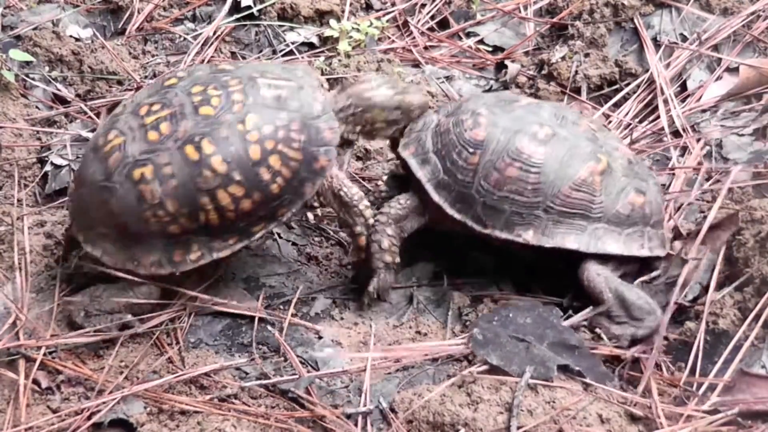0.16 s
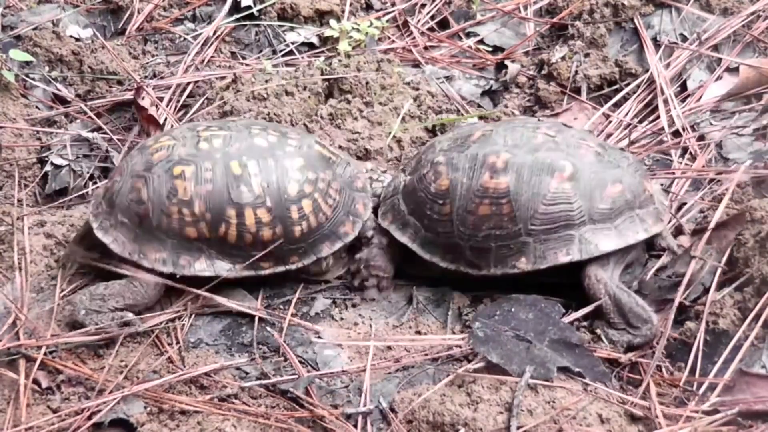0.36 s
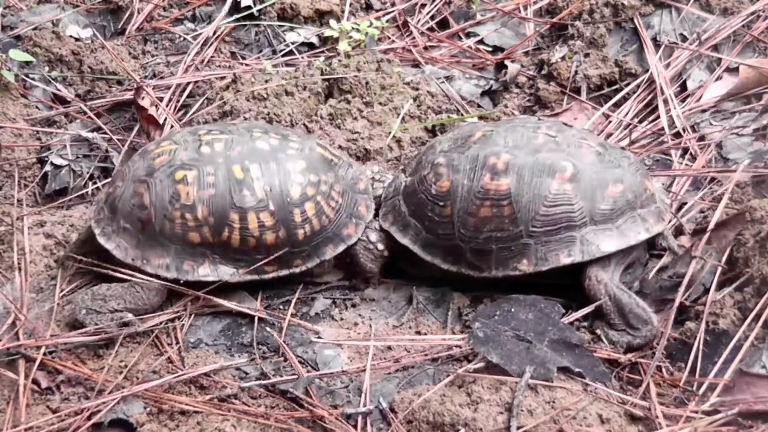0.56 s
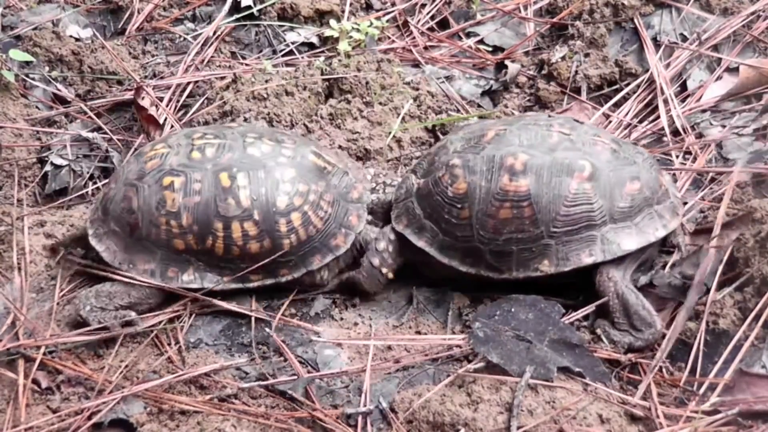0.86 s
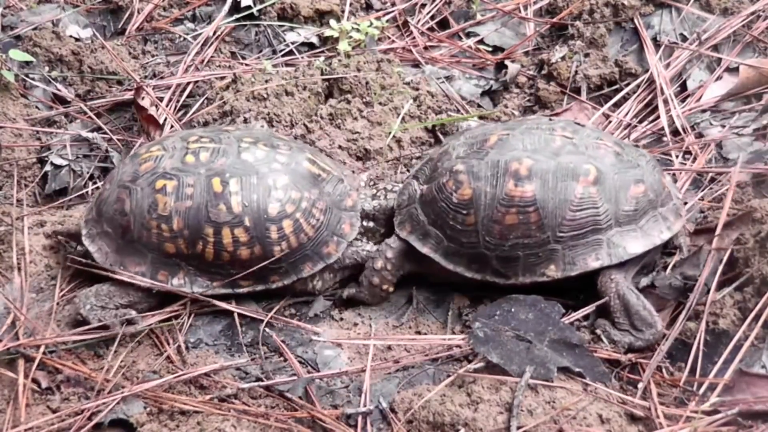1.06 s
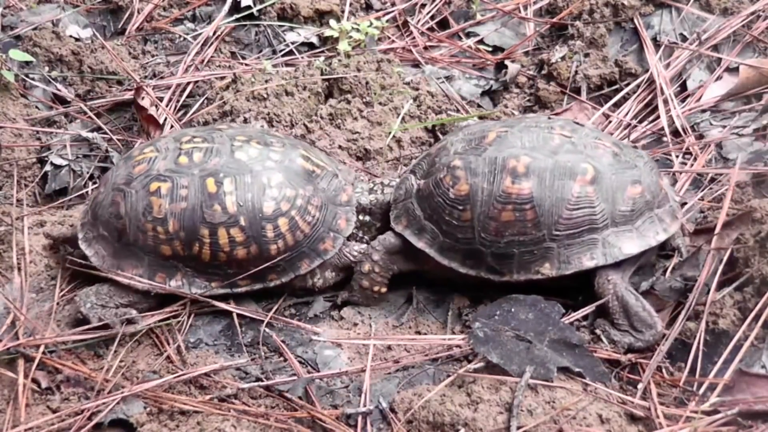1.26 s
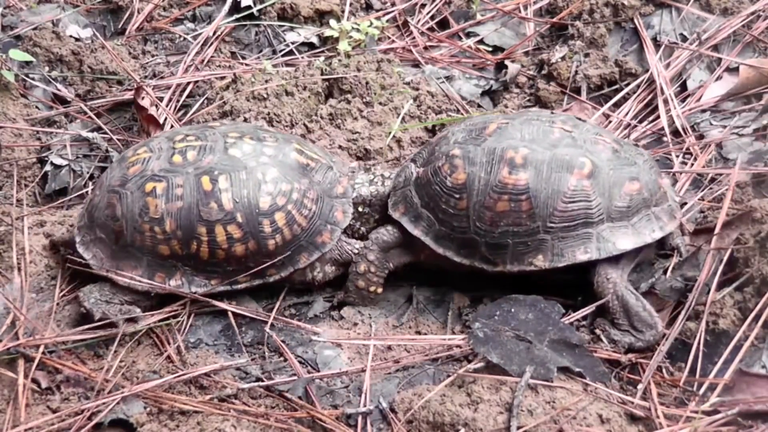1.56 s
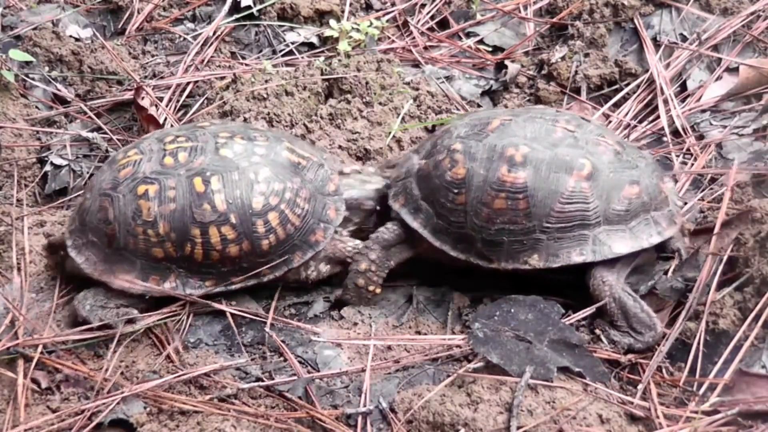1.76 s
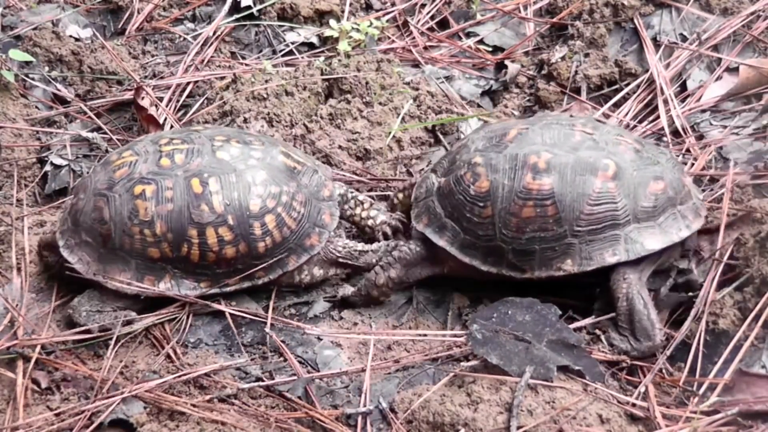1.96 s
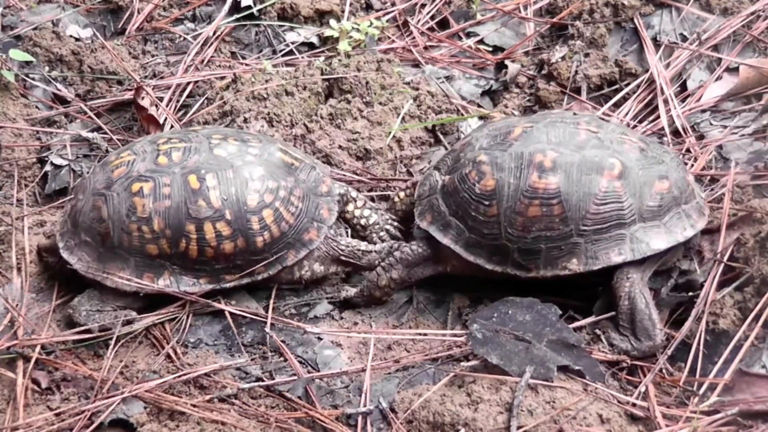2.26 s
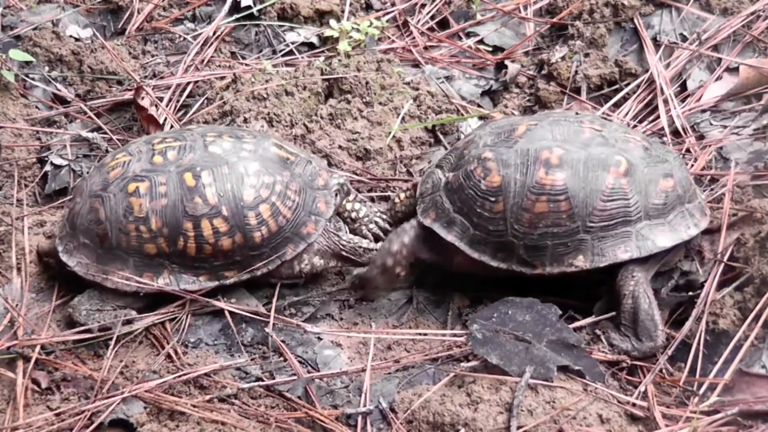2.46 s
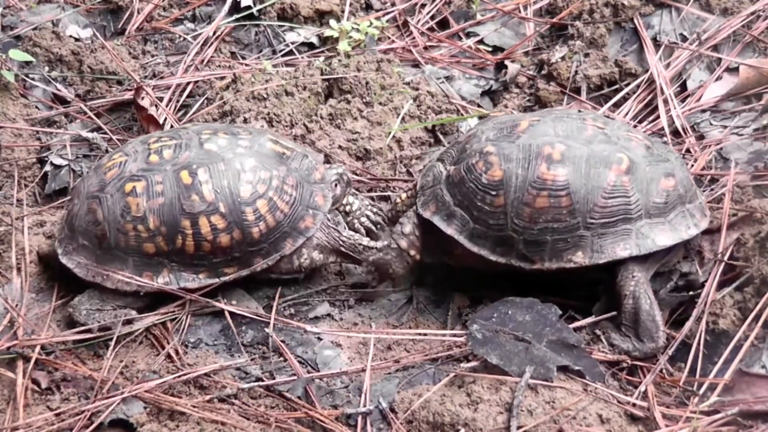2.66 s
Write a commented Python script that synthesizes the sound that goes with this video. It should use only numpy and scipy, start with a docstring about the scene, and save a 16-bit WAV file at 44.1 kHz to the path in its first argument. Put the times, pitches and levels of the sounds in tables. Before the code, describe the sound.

Shrill insect chorus fills a woodland while turtle shells scuff and bump and a crow caws

```python
"""A chorus of insects shrills near 7 kHz all around a woodland floor, over a low rumble and a soft hiss.
Far off, a crow caws four times as pulsed harmonics that echo among the trees; a faint noise trill and
a thin wavering tone fade out after the first second. Close to the microphone, two turtles shove each
other: shells scuff through soil and needles as filtered grains and noise bursts, bump down as dull
pushes, and give one sharp snap made of a crack, ringing modes and a scattered tail."""
import sys
import numpy as np
from scipy import signal
from scipy.fft import rfft, irfft, next_fast_len
from scipy.io import wavfile

SR = 44100
rng = np.random.default_rng(int(sys.argv[2]) if len(sys.argv) > 2 else 0)


def persist_wave(psi):
    """Save psi, clipped to +-1, as 16-bit WAV."""
    counts = np.round(np.clip(psi, -1, 1) * 32767).astype(np.int16)
    wavfile.write(sys.argv[1], SR, np.atleast_2d(counts).T)


N = 123480  # samples, 2.8 s


def undb(db):
    """Decibels to an amplitude factor."""
    return 10 ** (np.asarray(db) / 20)


def unit(x):
    """Scale to rms 1."""
    return x / np.sqrt(np.mean(x ** 2) + 1e-30)


def noise():
    """White noise over the whole scene."""
    return rng.standard_normal(N)


def clock():
    """Time of every sample in seconds."""
    return np.arange(N) / SR


def colour(x, points):
    """Causal minimum-phase filter through (Hz, dB) points."""
    size = next_fast_len(N + 8192, real=True)
    hz, db = np.array(sorted(points), float).T
    f = np.maximum(np.arange(size // 2 + 1) * SR / size, 1)
    log_gain = np.log(undb(np.interp(np.log(f), np.log(hz), db)))
    # Folding the cepstrum onto positive time makes the filter causal
    cepstrum = irfft(log_gain, size)
    cepstrum[1:size // 2] *= 2
    cepstrum[size // 2 + 1:] = 0
    response = np.exp(rfft(cepstrum))
    return irfft(rfft(x, size) * response, size)[..., :N]


def wavering(hz, width_hz):
    """A narrow noise band: a tone whose level and phase wander, rms 1."""
    f = np.arange(N // 2 + 1) * SR / N
    band = np.exp(-2 * ((f - hz) / width_hz) ** 2)
    return unit(irfft(rfft(noise()) * band, N))


def decay(start, seconds):
    """Sudden onset, exponential fall."""
    t = clock() - start
    return (t >= 0) * np.exp(-np.maximum(t, 0) / seconds)


def ring_down(t, t60):
    """Exponential fall of 60 dB in t60 seconds."""
    return np.exp(-np.log(1000) * t / t60)


def blow(x, db):
    """Set a short sound's level, its energy taken over 5 ms."""
    return unit(x) * np.sqrt(.005 * SR / N) * undb(db)


def stereo(mid, side):
    """Left and right from mid and side."""
    return np.array([mid + side, mid - side])


def spread(x, side_db):
    """Brief scatter from the ground makes left and right differ."""
    scatter = noise()[:768] * np.hanning(1536)[768:]
    side = signal.fftconvolve(x, scatter / np.linalg.norm(scatter))[:N]
    return stereo(x, undb(side_db) * side)


# Spectrum of the air around the microphone. Each row: frequency in Hz, gain in dB.
AIR_SPECTRUM = [(15, -23), (28, -18), (40, -9.5), (62, -8), (110, 1.5), (160, -1.5), (250, -7.5),
                (400, -10.5), (650, -15), (1100, -14), (2000, -18), (2700, -20), (3500, -21), (5000, -25),
                (9500, -33), (12000, -26.5), (14000, -22), (16000, -42)]
# Side against mid in that air. Each row: frequency in Hz, side gain in dB.
AIR_SIDE_SPECTRUM = [(30, 17), (70, -8), (150, -2.5), (500, 6.5), (1500, 0), (3000, -4), (9000, -27.5),
                     (13000, -0.5)]
# Balance of that air. Each row: frequency in Hz, left minus right in dB.
AIR_BALANCE = [(30, 2.5), (120, -4.5), (300, -1), (900, 0), (16000, 0)]
AIR_DB = -58


def air():
    """Low distant rumble under a soft hiss: filtered noise, its bass balance varying with frequency."""
    mid = unit(colour(noise(), AIR_SPECTRUM))
    side = colour(unit(colour(noise(), AIR_SPECTRUM)), AIR_SIDE_SPECTRUM)
    left, right = undb(AIR_DB) * stereo(mid, side)
    # Each channel takes half of the difference
    left = colour(left, [(hz, db / 2) for hz, db in AIR_BALANCE])
    right = colour(right, [(hz, -db / 2) for hz, db in AIR_BALANCE])
    return np.array([left, right])


STROKE_SHARE = .55  # sounding part of each stroke cycle
STROKE_SWEEP_HZ, STROKE_SCATTER_HZ, STROKE_SCATTER_DB = 346.7, 88.26, 2


def singer(rate, pitch_hz):
    """Each stroke is a short falling tone with its own strength and pitch, mixed with a noise band."""
    cycle = clock() * rate + rng.random()
    stroke = cycle.astype(int) % 512
    size, detune, angle = rng.standard_normal((512, 3))[stroke].T
    u = np.minimum(cycle % 1 / STROKE_SHARE, 1)  # progress through the stroke, then silence
    hz = pitch_hz + STROKE_SCATTER_HZ * detune + STROKE_SWEEP_HZ * (.5 - u)
    tone = np.sin(2 * np.pi * np.cumsum(hz) / SR + np.pi * angle)
    tone = tone + 0.61 * wavering(pitch_hz, 780)
    strength = np.sin(np.pi * u) * undb(STROKE_SCATTER_DB * size)
    return unit(strength * tone)


def drone(hz, wander_hz):
    """An even note whose pitch trembles."""
    pitch = hz + wander_hz * wavering(0, 40.1)
    return unit(np.sin(2 * np.pi * np.cumsum(pitch) / SR))


# The nearest insects. Each row: strokes per second, pitch in Hz, level in dB.
NEAR_SINGERS = [(58.37, 7080, -51.5), (36.96, 6900, -50), (19.07, 6850, -53), (13.25, 7200, -59.5),
                (99.9, 7050, -57.5)]
# Insects that hold one note. Each row: pitch in Hz, pitch wander in Hz, level in dB.
HELD_NOTES = [(6716, 18.12, -59), (6970, 13.74, -54.5)]
# Spectrum of the far chorus. Each row: frequency in Hz, gain in dB.
CHORUS_SPECTRUM = [(5000, -52), (5450, -28), (5750, -21), (5950, -11.5), (6500, -13), (6720, -6),
                   (6950, 1.5), (7250, -3.5), (7580, -7.5), (7950, -22.5), (8500, -24.5), (9200, -35.5),
                   (10500, -59.5)]
CHORUS_DB, INSECT_SIDE_DB = -46.5, -19


def insects():
    """A few near singers and held notes stand out of a far chorus blurred into filtered noise."""
    near = sum(undb(db) * singer(rate, hz) for rate, hz, db in NEAR_SINGERS)
    held = sum(undb(db) * drone(hz, wander) for hz, wander, db in HELD_NOTES)
    far = undb(CHORUS_DB) * unit(colour(noise(), CHORUS_SPECTRUM))
    return spread(near + held + far, INSECT_SIDE_DB)


# Spectrum of the faint trill. Each row: frequency in Hz, gain in dB.
TRILL_SPECTRUM = [(2200, -22), (2650, 0), (3000, 1), (3200, -2), (3550, 0), (4000, -12), (4700, -5),
                  (5600, -24)]
TRILL_HZ, TRILL_DB = 59.9, -67
TRILL_DECAY = 0.4  # decay constant of a pulse, in pulse periods
TRILL_END_S, TRILL_FADE_S = 1.06, 0.069  # the fade begins at the end time
TONE_HZ, TONE_WIDTH_HZ, TONE_DB = 1051, 88, -64.5
TONE_START_S, TONE_END_S, TONE_FADE_S = 0.3, 0.98, 0.29  # full between start and end


def far_calls():
    """A faint rattling trill of decaying noise pulses, and a thin wavering tone."""
    t = clock()
    pulses = noise() * np.exp(-(t * TRILL_HZ % 1) / TRILL_DECAY)
    fade = np.clip((TRILL_END_S - t) / TRILL_FADE_S + 1, 0, 1)
    trill = undb(TRILL_DB) * unit(colour(pulses, TRILL_SPECTRUM)) * fade
    gate = np.clip(np.minimum(t - TONE_START_S, TONE_END_S - t) / TONE_FADE_S + 1, 0, 1)
    tone = undb(TONE_DB) * gate * wavering(TONE_HZ, TONE_WIDTH_HZ)
    return spread(trill + tone, -20)


# Colour of the echoes among the trees. Each row: frequency in Hz, gain in dB.
WOOD_SPECTRUM = [(300, -20), (720, -1), (1000, -1), (1150, 1), (1330, 2.5), (1490, 0), (2200, -4),
                 (5000, -2.5), (9000, -10.5)]
WOOD_SIDE_DB = -7.5


def echoes(x, envelope):
    """A cloud of random reflections under an envelope, unlike left and right."""
    def cloud():
        reflections = unit(colour(noise() * envelope, WOOD_SPECTRUM))
        return signal.fftconvolve(x, reflections)[:N] / np.sqrt(N)

    mid, side = cloud(), cloud()
    return stereo(mid, undb(WOOD_SIDE_DB) * side) / 2


# The caws. Each row: start in seconds, length in seconds, pitch ratio, level in dB.
CAW_TIMES = [(.524, 0.11, 0.99, -50), (0.887, 0.12, 0.97, -50.5), (1.366, .126, 1.0, -50),
             (1.898, 0.13, 1.0, -49)]
# Course of every caw. Each row: share of its length, pitch in Hz before the ratio, effort in dB,
# extra level of the second harmonic in dB, roughness from 0 to 1.
CAW_COURSE = [(0, 520, -13, 13, .6), (.12, 625, -2, -3.5, .55), (.25, 740, -5.5, -10, 0.1),
              (.42, 755, -2.5, -1, 0.26), (.58, 743.6, -5, 4.5, 0.09), (.76, 659, -7, 5.5, 0.6),
              (1, 570, -6.5, 1, 0.4)]
# Resonances of the crow's throat. Each row: frequency in Hz, gain in dB.
THROAT_SPECTRUM = [(400, -21), (720, -16), (1000, -13), (1250, -9.5), (1490, 1.5), (1620, -8),
                   (1950, -11.5), (2250, -13.5), (2600, -29), (3100, -22), (3750, -20.5), (4500, -29),
                   (5300, -25.5), (7000, -46)]
HOARSE_JITTER, HOARSE_SHIMMER = 0.0754, 0.96  # pitch and level wander at full roughness
TRUNKS_S, TRUNKS_DB = 0.097, -5  # decay constant and gain of the early echoes
WOOD_T60_S, WOOD_DB = 2.45, -2.5


def crow():
    """Arched harmonic calls, hoarse at both ends; trunks scatter dense early echoes, then a long tail."""
    t, voice = clock(), 0
    share, pitch, effort, second, rough = np.array(CAW_COURSE).T
    for start, length, ratio, db in CAW_TIMES:
        u = (t - start) / length  # progress through the caw
        hoarse = np.interp(u, share, rough)
        jitter = 1 + HOARSE_JITTER * hoarse * wavering(123.2, 296)
        hz = ratio * np.interp(u, share, pitch) * jitter
        phase = 2 * np.pi * np.cumsum(hz) / SR
        swell = undb(np.interp(u, share, second))
        harmonics = sum(np.cos(k * phase) * (swell if k == 2 else 1) for k in range(1, 10))
        pulses = harmonics * (1 + HOARSE_SHIMMER * hoarse * wavering(149, 160))
        gate = np.clip(np.minimum(u, 1 - u) * 20, 0, 1) * undb(np.interp(u, share, effort))
        caw = unit(colour(pulses * gate, THROAT_SPECTRUM))
        voice = voice + undb(db) * caw * np.sqrt(length * SR / N)  # level over the caw's own length
    trunks = echoes(voice, decay(0, TRUNKS_S))
    tail = echoes(voice, ring_down(t, WOOD_T60_S) * (1 - np.exp(-t / 0.029)))
    return spread(voice, -8.5) + undb(TRUNKS_DB) * trunks + undb(WOOD_DB) * tail


# Shells bump on the soil. Each row: start in seconds, level in dB.
BUMP_TIMES = [(.081, -52.5), (.093, -52), (.2445, -47), (.2485, -42), (.2797, -27.5), (.282, -39.5),
              (.342, -50), (.355, -47.5), (.371, -49.5)]
# Colour of a bump. Each row: frequency in Hz, gain in dB.
BUMP_SPECTRUM = [(60, -48), (150, -8), (380, 3.5), (600, 5), (900, -3), (1300, -17.5), (1700, -10),
                 (2300, -31), (5000, -24)]
BUMP_DECAY_S, BUMP_TAIL_S, BUMP_TAIL_DB = 0.00047, 0.0077, -8.5  # tail level is relative to the push


def bumps():
    """A dull push on the soil, followed by a short shudder of noise."""
    out = 0
    for start, db in BUMP_TIMES:
        push = np.diff(decay(start, BUMP_DECAY_S), prepend=0)
        shudder = noise() * decay(start, BUMP_TAIL_S)
        out = out + blow(colour(push, BUMP_SPECTRUM), db)
        out = out + blow(colour(shudder, BUMP_SPECTRUM), db + BUMP_TAIL_DB)
    return out


# Shells slide through needles. Each row: peak time in seconds, rise in seconds, fall in seconds,
# level in dB.
SLIDE_TIMES = [(.09, 0.042, .05, -80), (.232, 0.068, 0.043, -46.5), (.352, 0.027, 0.031, -44),
               (1.88, 0.082, 0.11, -57)]
# Colour of soil and needles. Each row: frequency in Hz, gain in dB.
SLIDE_SPECTRUM = [(200, -13.5), (500, 4), (1200, -9), (2300, -8), (3800, 1.5), (6000, -2.5), (10000, -2.5),
                  (14000, -5), (16000, -18)]
GRAINS_PER_S, GRAIN_SCATTER_DB = 2000, 4.0


def slides():
    """Dense grains of soil and needles swell and die as a shell moves."""
    t, push = clock(), 0
    for peak, rise, fall, db in SLIDE_TIMES:
        push = push + undb(db) * np.exp(np.minimum((t - peak) / rise, (peak - t) / fall))
    hits = rng.random(N) < GRAINS_PER_S / SR
    size = undb(GRAIN_SCATTER_DB * np.minimum(rng.exponential(size=N), 5))
    grains = hits * np.sign(noise()) * size
    return push * unit(colour(grains, SLIDE_SPECTRUM))


def clicks(rows, spectrum, seconds):
    """Tiny decaying noise bursts of fracture, one to a row, coloured without changing their overall level."""
    bursts = sum(blow(noise() * decay(start, seconds), db) for start, db in rows)
    return unit(colour(bursts, spectrum)) * np.std(bursts)


# Grit catches under a shell. Each row: start in seconds, level in dB.
SCRAPE_TIMES = [(.078, -55), (.093, -47), (.1345, -43), (.192, -46.5), (.2505, -44), (.2585, -55),
                (.2828, -32.5), (.315, -43.5), (.3385, -43), (.3415, -37), (.3545, -32), (.357, -36.5)]
# Colour of the grit. Each row: frequency in Hz, gain in dB.
GRIT_SPECTRUM = [(200, 2), (600, -7), (1700, -1), (2400, -3.5), (3500, 2), (4800, 4), (6000, -8.5),
                 (8000, -12), (11000, -4), (14000, -13), (16000, 3)]


def scrapes():
    """Grit gives short bursts of noise under the shells."""
    return clicks(SCRAPE_TIMES, GRIT_SPECTRUM, seconds=0.0016)


# Needles tick. Each row: start in seconds, level in dB.
TICK_TIMES = [(.6545, -57), (1.009, -50), (1.200, -54), (1.5975, -52), (1.803, -57), (1.925, -56),
              (1.986, -57), (2.217, -48.5), (2.602, -53)]
# Colour of a tick. Each row: frequency in Hz, gain in dB.
TICK_SPECTRUM = [(1500, -20), (4000, -8), (9000, 1), (14000, 0), (16000, -3)]


def ticks():
    """Needles give single, still shorter bursts of noise."""
    return clicks(TICK_TIMES, TICK_SPECTRUM, seconds=.001)


# Ring of the snap. Each row: frequency in Hz, level in dB before scaling, 60 dB decay time in seconds.
RING_MODES = [(157, -18.5, 0.053), (341, -11, 0.023), (610, -7.5, 0.018), (900, -7.5, 0.0093),
              (1270, -12, 0.014), (1780, -3, 0.014), (2040, 2.5, 0.0099), (2880, 0, .02),
              (3140, -0.5, 0.01), (3340, -4, .015), (3950, -1, 0.007), (4800, -6.5, 0.0066),
              (6640, -2, 0.0053)]
# Colour of the crack. Each row: frequency in Hz, gain in dB.
CRACK_SPECTRUM = [(300, -11.5), (2800, 0.5), (4500, -1), (5300, -10), (6800, -4), (8700, -11), (10000, -7),
                  (11700, -8), (13000, -16), (16000, -13)]
# Colour of the scatter from the litter. Each row: frequency in Hz, gain in dB.
SNAP_TAIL_SPECTRUM = [(300, -7), (1800, -16), (2900, -0.5), (3600, 3), (4400, -7), (5500, -13),
                      (12000, -16), (16000, -31)]
SNAP_S, RING_DB = 1.812, -28.5
CRACK_DB, CRACK_DECAY_S = -30, 0.00066
SNAP_TAIL_DB, SNAP_TAIL_S = -37.5, 0.029


def snap():
    """One hard click: a crack, a brief ring of decaying modes and scatter from the litter."""
    t = np.maximum(clock() - SNAP_S, 0)
    ring = 0
    for k, (hz, db, t60) in enumerate(RING_MODES):
        mode = undb(db) * np.sin(2 * np.pi * hz * t) * ring_down(t, t60)
        ring = ring + mode * (-1) ** k  # neighbouring modes start in opposite directions
    crack = colour(noise() * decay(SNAP_S, CRACK_DECAY_S), CRACK_SPECTRUM)
    tail = colour(noise() * decay(SNAP_S, SNAP_TAIL_S), SNAP_TAIL_SPECTRUM)
    return blow(ring, RING_DB) + blow(crack, CRACK_DB) + blow(tail, SNAP_TAIL_DB)


def turtles():
    """Two shoving shells close by: bumps spread wider than the narrow litter sounds."""
    litter = scrapes() + slides() + ticks() + snap()
    return spread(bumps(), side_db=-14.5) + spread(litter, side_db=-26)


def scene():
    """The woods all around, the turtles close by."""
    return air() + insects() + far_calls() + crow() + turtles()


# Response of the microphone. Each row: frequency in Hz, gain in dB.
MICROPHONE_RESPONSE = [(15, -22), (35, -7.5), (60, 2), (2300, 0), (2520, -3), (2680, 0.5), (16000, 0)]
TOP_HZ = 15700


def record(dry):
    """The microphone thins the deep bass and has a narrow dip; the recorder cuts the top."""
    heard = colour(dry, MICROPHONE_RESPONSE)
    lowpass = signal.firwin(161, TOP_HZ, window="blackman", fs=SR)
    return signal.fftconvolve(heard, lowpass[None], mode="same")


dry = scene()
out = record(dry)
persist_wave(out)
```